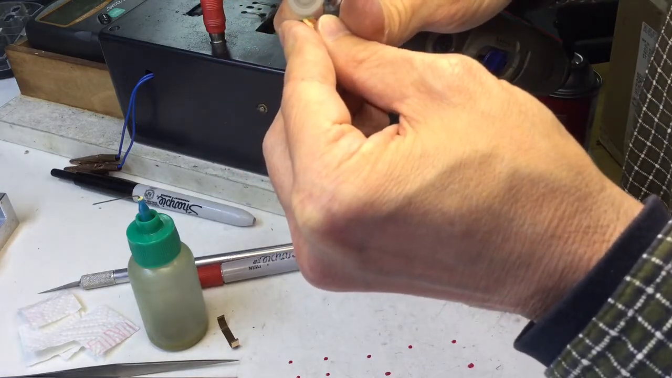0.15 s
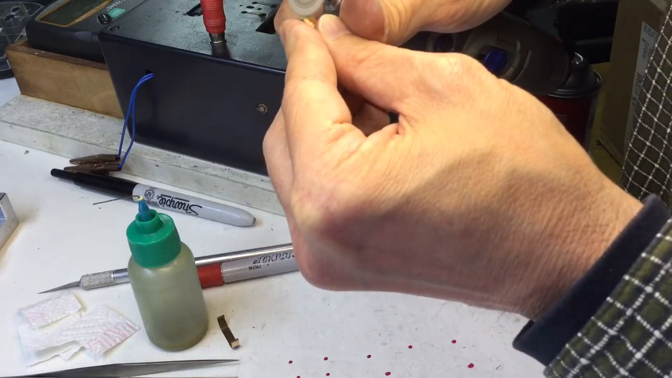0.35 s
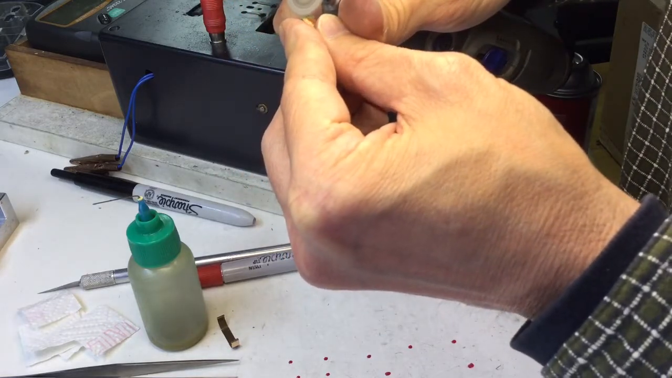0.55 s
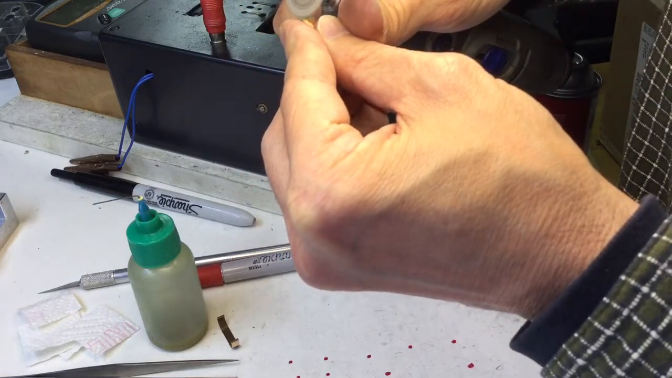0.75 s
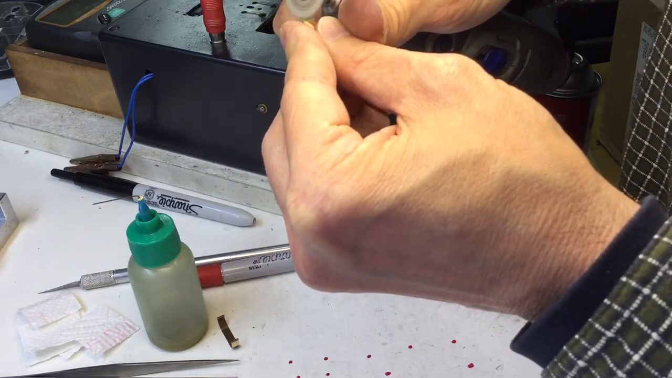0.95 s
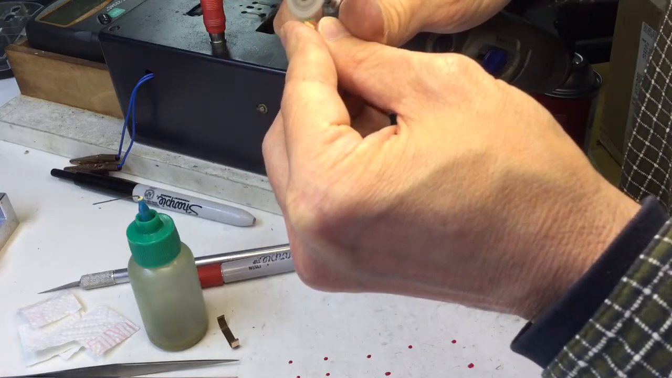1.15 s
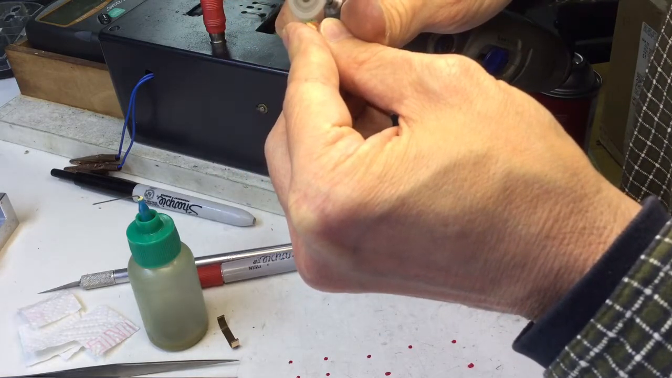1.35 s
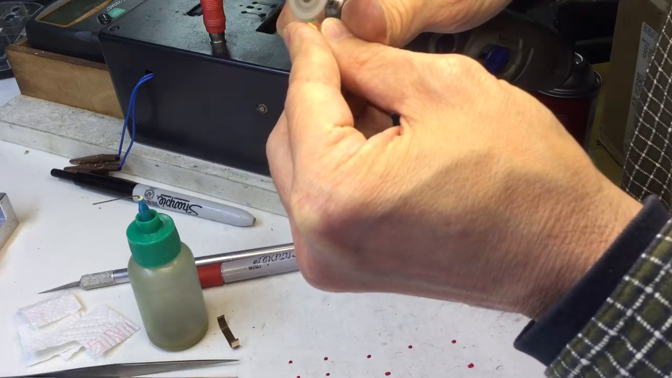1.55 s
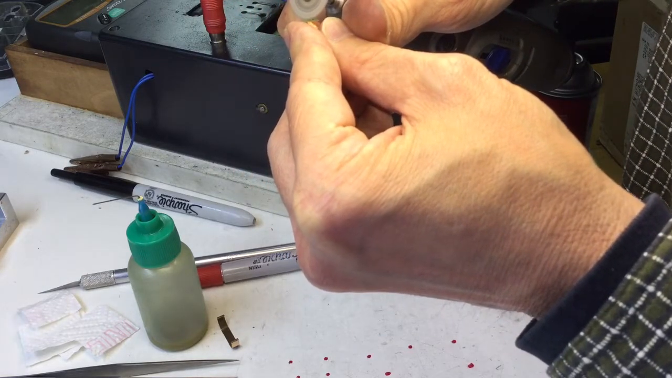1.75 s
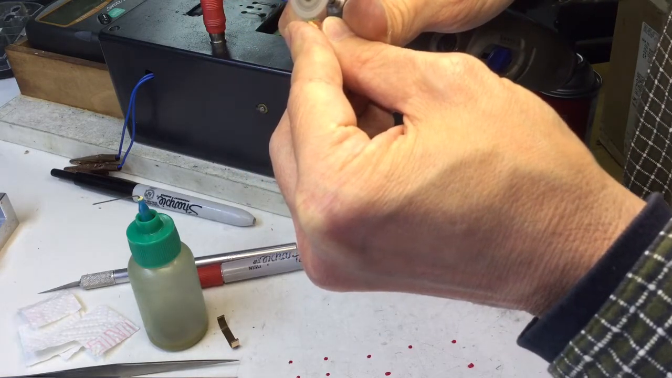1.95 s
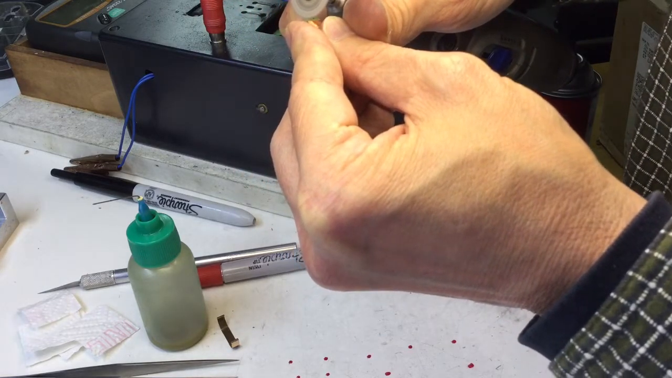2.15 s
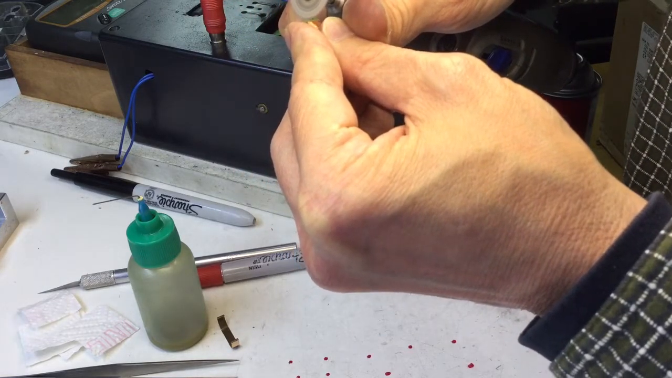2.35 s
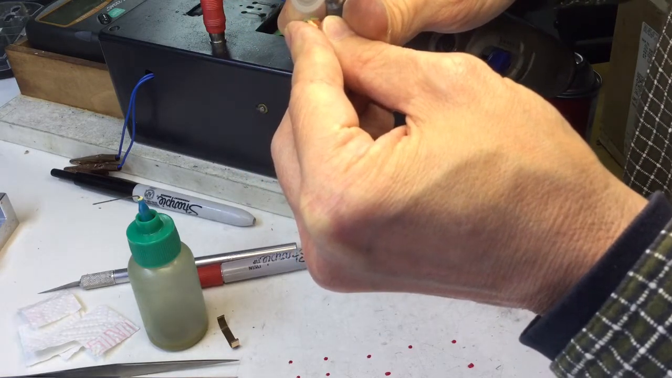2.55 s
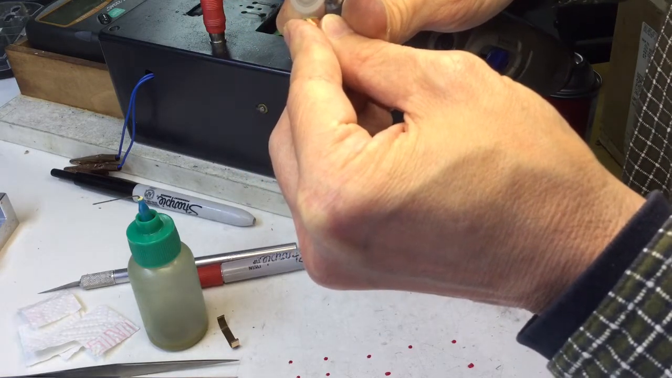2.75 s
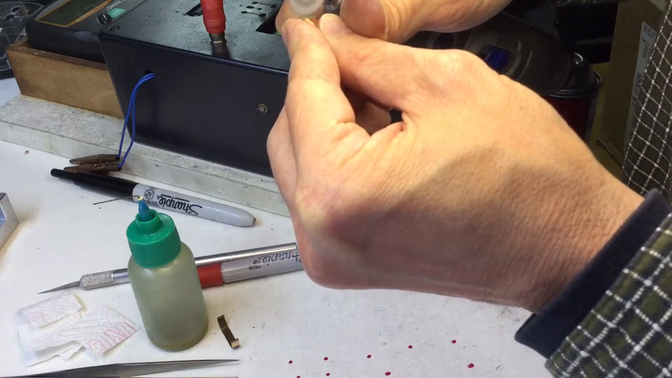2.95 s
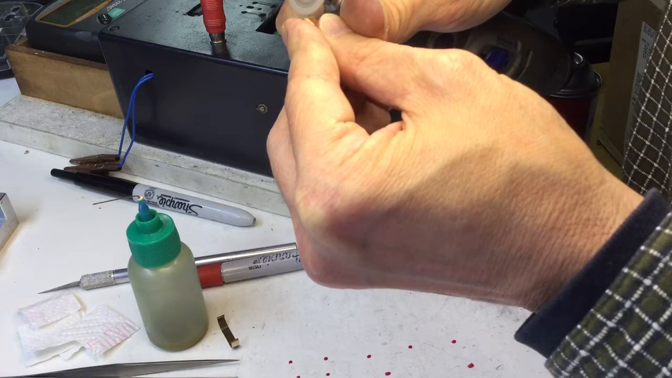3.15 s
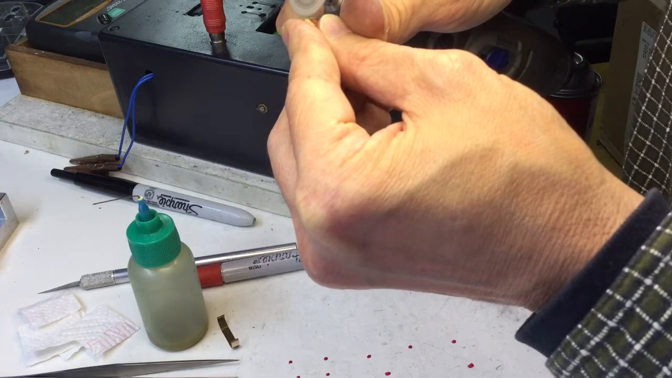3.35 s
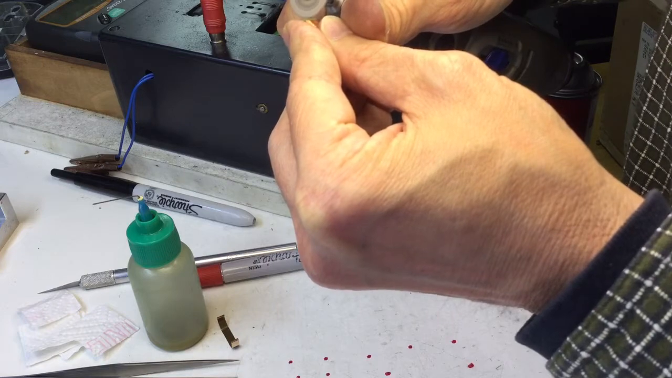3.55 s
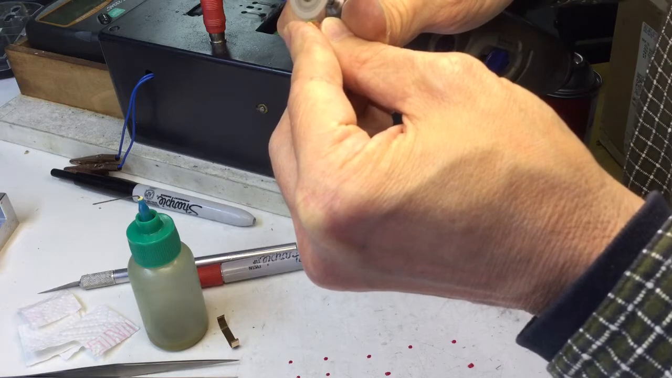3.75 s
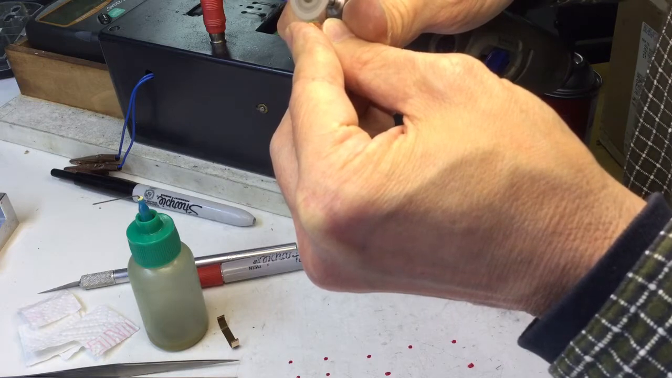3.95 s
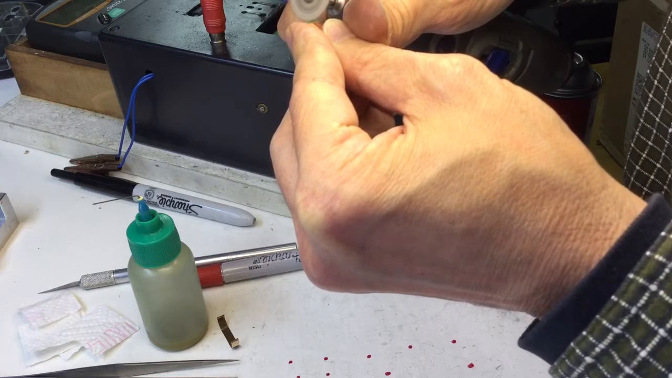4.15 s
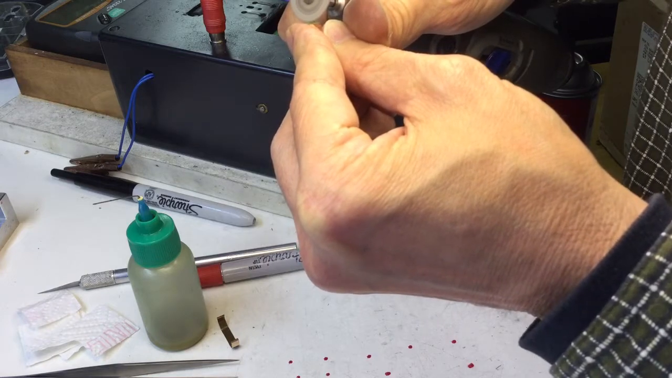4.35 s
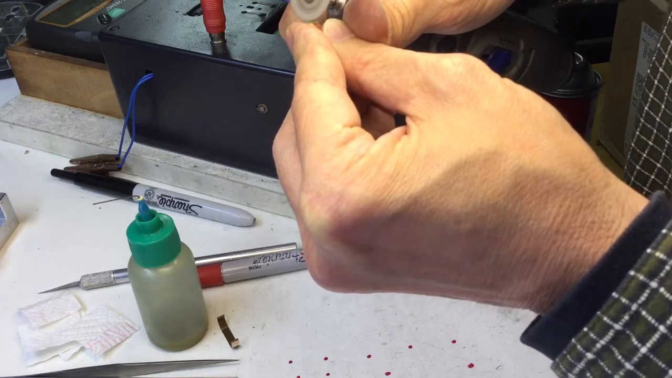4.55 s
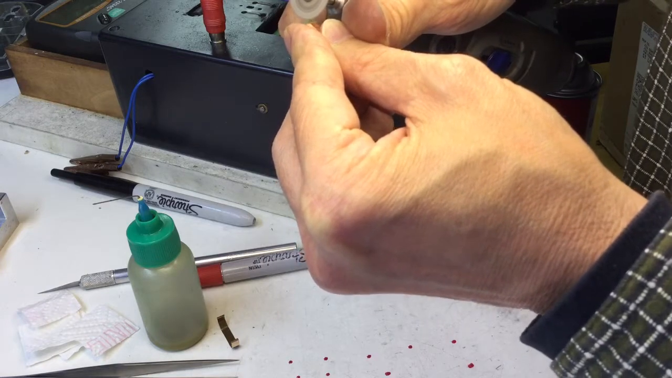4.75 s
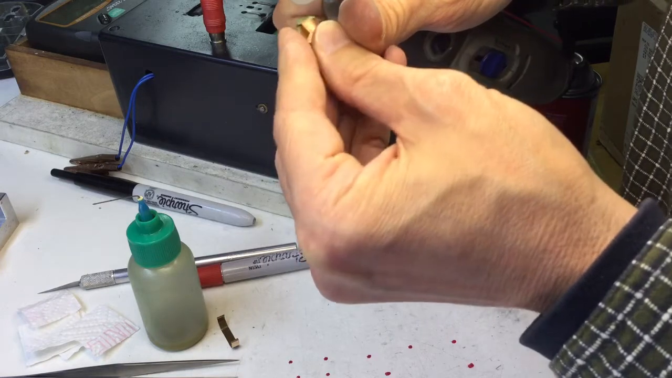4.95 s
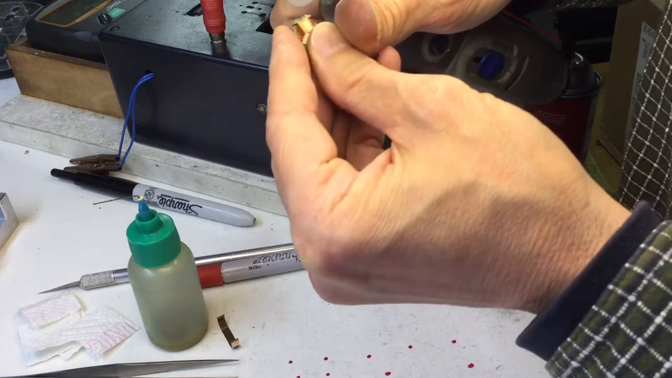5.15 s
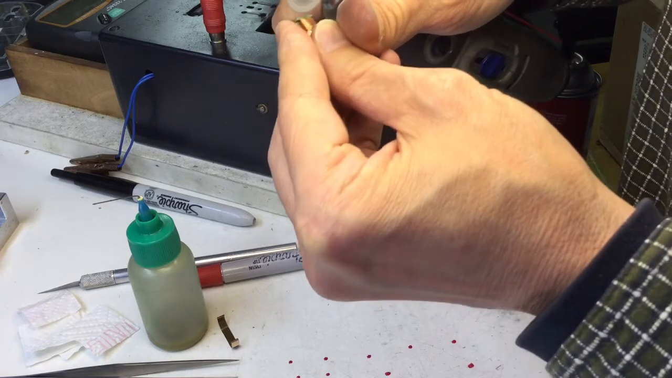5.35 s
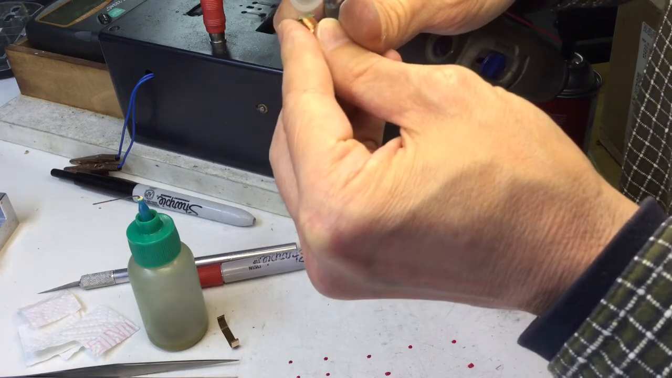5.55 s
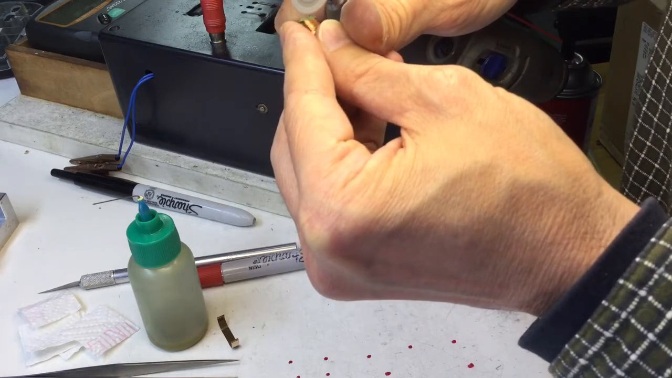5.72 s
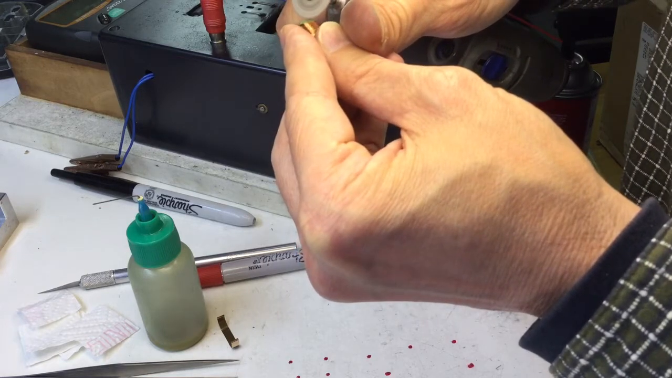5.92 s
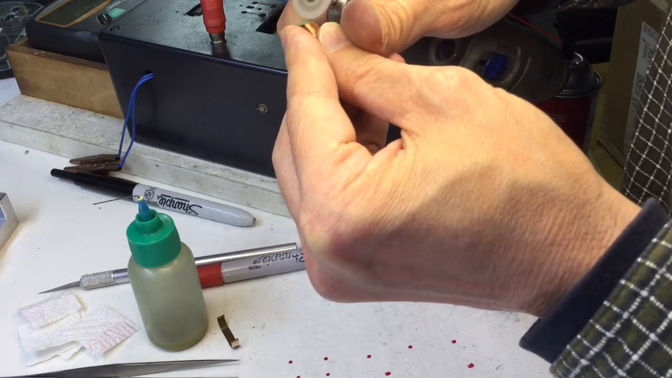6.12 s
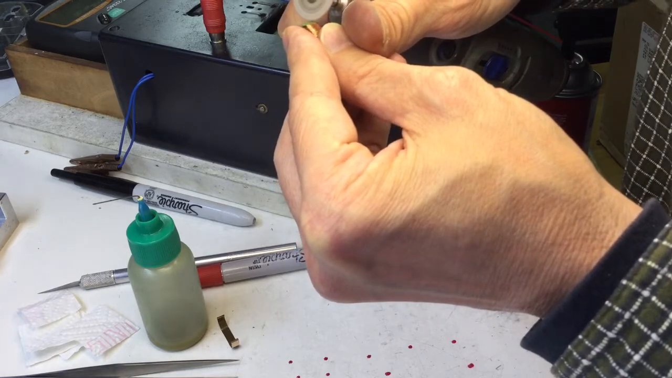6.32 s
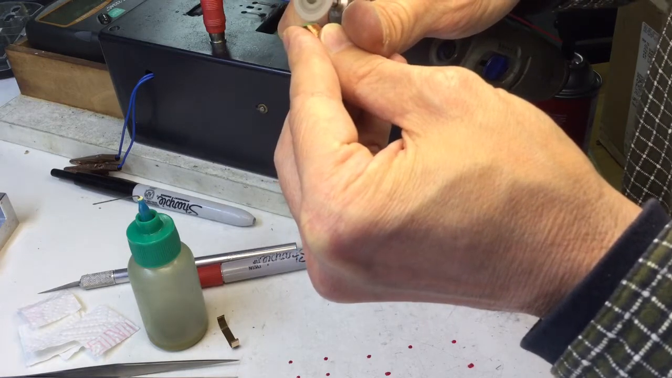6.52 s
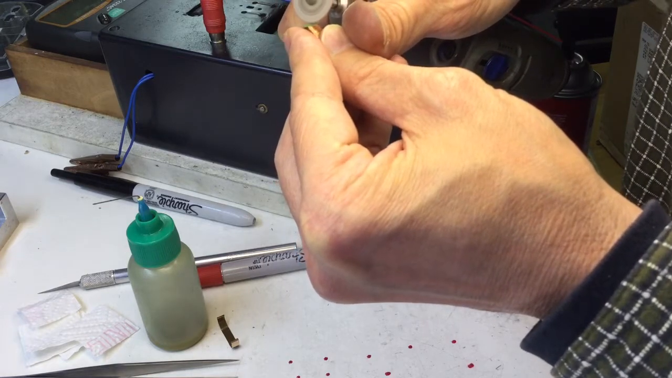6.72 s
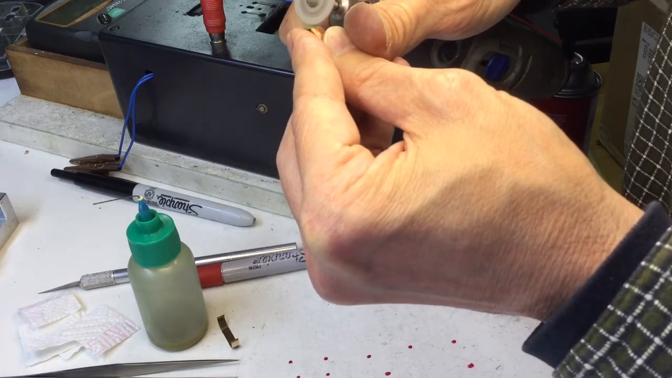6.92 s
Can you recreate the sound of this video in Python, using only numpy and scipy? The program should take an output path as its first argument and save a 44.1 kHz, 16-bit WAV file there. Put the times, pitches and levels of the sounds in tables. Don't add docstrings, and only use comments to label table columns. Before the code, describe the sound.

A small rotary tool grinds a hand-held metal part with a harsh, ringing buzz, its motor sagging under load and whining back up in the pauses.

```python
import sys
import numpy as np
from scipy import signal
from scipy.fft import rfft, irfft, next_fast_len
from scipy.io import wavfile
from scipy.ndimage import uniform_filter1d, map_coordinates

SR = 44100
rng = np.random.default_rng(int(sys.argv[2]) if len(sys.argv) > 2 else 0)


def boost_factor(decibels):
    exponent = np.asarray(decibels, float) / 20
    return 10 ** exponent


def log_audio(samples):
    frames = np.atleast_2d(samples).T
    limited = np.clip(frames, -1, 1)
    pcm = np.round(limited * 32767).astype(np.int16)
    wavfile.write(sys.argv[1], SR, pcm)


N = 312228
TIME = np.arange(N) / SR
FREE_SPEED = 163.5

# full contact t/s, closing time/s, leaving t/s, parting time/s
CONTACTS = [
    (-.1, .02, 2.46, .02),
    (2.995, .028, 4.803, 0.031),
    (5.448, 0.012, 5.558, 0.027),
    (5.864, .007, 7.3, .04),
]


def grinding(turns, speed):
    # t/s, pressure level/dB, pinch (0-1), contact arc/turns
    hand = [
        [(0, -20, 0.23, 0.31), (.3, -20, 0.15, 0.33), (.8, -20.5, 0.4, 0.34), (1.1, -21, .05, 0.32),
         (1.3, -23.5, .7, 0.35), (1.55, -22.5, 0.83, 0.3), (2.2, -21, 0.6, 0.23), (2.41, -20, 0.67, 0.24),
         (2.46, -26.5, 0.3, 0.32)],
        [(3.02, -27, 0.1, 0.33), (3.07, -24, 0, 0.16), (3.25, -24.5, 0.33, 0.3), (3.4, -22.5, 0.31, .36),
         (3.75, -22, 0.38, 0.34), (4.05, -22.5, .1, 0.41), (4.4, -21.5, .5, 0.35), (4.47, -21, 0.64, 0.25),
         (4.8, -21, 0.66, 0.29)],
        [(5.448, -25.5, 0.1, .26), (5.544, -26, 0.1, .26)],
        [(5.866, -24.5, 0, .27), (5.93, -24, 0.14, 0.18), (6.18, -22, 0.1, 0.3), (6.26, -22.5, 1, 0.33),
         (6.4, -23, 0.4, 0.42), (6.5, -23, 0.04, 0.53), (6.64, -21.5, 0.5, 0.44), (6.82, -23, 0.34, 0.53),
         (7.08, -20.5, 0.3, 0.45)],
    ]
    # f/Hz, width/Hz, level/dB
    low_modes = [(2040, 55, -13.5), (2434, 92, -9), (3414, 192, -1)]
    loose_modes = [(3806, 29, -3.5), (4388, 176, 6.5), (4517, 137, 7), (5484, 430, -12.5)]
    pinched_modes = [(3847, 25, -12), (4552, 176, 3.5), (4626, 296, 1), (5075, 265, -8.5)]
    rasp_modes = [(7250, 150, -2), (7660, 420, -6.5), (8580, 560, 1), (9290, 330, -9), (9030, 550, -16),
                  (10170, 200, -7.5)]
    sizzle_modes = [(10350, 510, 7), (11130, 770, 5.5), (11430, 460, 5), (12600, 970, -1), (13230, 4300, 9),
                    (14100, 500, -1), (14900, 550, 5)]
    # f/Hz, width/Hz, level/dB
    grip_modes = [(280, 48, -9.5), (577, 65, -3), (796, 147, -5), (1193, 360, -1), (1550, 276, 2.5),
                  (2350, 1500, -4)]
    # t/s, level/dB, time back to
    # normal/s
    edge_catches = [(.04, 3.5, 0.58), (.35, 2.5, 0.087), (1.11, 3, .2), (1.31, 6, 0.075), (1.44, 6, 0.059),
                    (1.55, 3, .3), (3.05, 3, 0.078), (3.458, 2.5, 0.041), (3.724, -1.5, 0.34),
                    (4.078, -5, 0.14), (5.448, 2.5, 0.08), (6.13, 3, 0.11), (6.634, 1.5, .18),
                    (7, 2, 0.079)]
    # t/s, level/dB, sinking time/s
    jolts = [
        (.05, 6, .5),
        (.6, 6, 0.33),
        (1.55, 6, 0.34),
        (3.02, -15, 0.17),
        (4.55, 5, 0.06),
        (4.62, -7, 0.084),
        (4.7, 6, 0.062),
        (5.47, 5, 0.1),
    ]
    # from t/s, to t/s, level/dB
    tips = [
        (1.327, 2.293, 6.5),
        (3.144, 3.237, 6.5),
        (3.326, 3.656, 3),
        (4.077, 4.78, 2.5),
        (5.5, 5.557, 3.5),
        (5.892, 5.915, 0.5),
        (6.24, 6.884, 4),
    ]
    # t/s, level/dB, sinking time/s
    grit_changes = [
        (.4, 5, .12),
        (1.3, -4, .08),
        (1.4, 4, .15),
        (3.07, 3, .1),
        (4.31, 6.5, 0.088),
        (5.88, 3, 0.055),
        (5.96, -3, 0.087),
    ]
    # t/s, level/dB, return time/s
    skids = [
        (1.07, -1, 0.054),
        (1.25, -3, .05),
        (3.0, -1, .06),
        (5.945, -4.5, 0.091),
        (6.17, -2, .05),
    ]

    press_db, pinch, arc = curves(np.vstack(hand))
    pinch = np.clip(pinch, 0, 1)
    arc = np.clip(arc, .15, .5)
    near = closing()
    touching = (near > 0) * boost_factor(37 * (near - 1) + press_db + surges(skids))
    sag = FREE_SPEED - speed

    landing = surges([(start, 1, 0.36) for start, *_ in CONTACTS[1:]])
    tipped_db = 0
    for start, end, db in tips:
        inside = np.minimum(TIME - start, end - TIME)
        tipped_db = tipped_db + db * np.clip(1 + inside / .05, 0, 1)

    arc_short = np.minimum(arc - 0.38, 0)
    low_db = -7.5 + 54 * arc_short + 6 * landing
    rasp_db = -6 + tipped_db + 1 * pinch
    sizzle_db = -2.5 + 7.2 * arc_short + landing + surges(grit_changes)
    sizzle_db -= 0.85 * TIME
    shake_db = -45.5 + 22.5 + 0.086 * sag + surges(jolts)

    strength = boost_factor((2.5 - 5.5 * arc) * rng.standard_normal(1200)[turns.astype(int)])

    push = strength * contact(turns, 1.2 * arc, lag=.04, slack_db=-16)
    push = push * grit(turns, memory=8, fresh=.14, size=128)
    loose = np.sqrt(1 - pinch) * rung(push, loose_modes)
    pinched = np.sqrt(pinch) * rung(push, pinched_modes)
    ring = steady(loose + pinched)
    low = steady(rung(push, low_modes))

    scrape = strength * contact(turns, .9 * arc, lag=0, slack_db=-20)
    scrape = scrape * grit(turns, memory=14, fresh=.25, size=224)
    rasp = rung(scrape, rasp_modes, sign=1)
    rasp = steady(rung(rasp, [(8460, 5300, 0)]))

    fine = strength * contact(turns, 1.2 * arc, lag=0, slack_db=-11)
    fine = fine * grit(turns, memory=5, fresh=.35, size=256)
    sizzle = rung(fine, sizzle_modes, sign=1)

    shake = contact(turns, arc, lag=0, slack_db=-7) * grit(turns, memory=22.0, fresh=0.044, size=64)
    grip = rung(shake, grip_modes)

    part = boost_factor(surges(edge_catches)) * ring + boost_factor(low_db) * low
    part = part + boost_factor(rasp_db) * rasp + boost_factor(sizzle_db) * sizzle
    return touching * (part + boost_factor(shake_db) * grip)


def grit(turns, memory, fresh, size):
    keep = np.exp(-1 / max(memory, .3))
    face = signal.lfilter([1], [1, -keep], rng.standard_normal((1200, size)), axis=0)
    worn = unit(map_coordinates(face.ravel(), [(turns + 60) * size]))
    fresh = np.clip(fresh, 0, 1)
    return np.sqrt(1 - fresh) * worn + np.sqrt(fresh) * rng.standard_normal(N)


def contact(turns, arc, lag, slack_db):
    angle = (turns - lag) % 1
    bite = np.clip(angle / 0.011, 0, 1) / (1 + (angle / arc) ** 6)
    return bite + boost_factor(slack_db)


def closing():
    near = 0
    for start, rise, end, fall in CONTACTS:
        ramp = np.minimum(1 + (TIME - start) / rise, 1 + (end - TIME) / fall)
        near = near + np.clip(ramp, 0, 1)
    return near


def steady(x):
    return x / np.sqrt(np.abs(uniform_filter1d(x ** 2, size=1300)) + 0.057)


def chatter():
    # t/s, peak level/dB
    bites = [
        (4.3104, -12),
        (4.319, -8),
        (5.9449, -8),
        (6.0017, -4.5),
        (6.0606, -2),
        (6.0922, -3.5),
        (6.124, -14),
        (6.144, -4),
    ]
    blows = np.zeros(N)
    burst = np.hanning(90) * np.sin(2 * np.pi * 4380 * np.arange(90) / SR)
    for s, db in bites:
        blows[round(s * SR):][:90] += boost_factor(db - 4.5) * burst
    return 1.75 * filtered(blows, lambda f: resonance(f, 4380, 300))


def shaft_speed():
    # t/s, shaft speed/(turns/s)
    loads = [
        [(0, 164), (.37, 144.5), (.62, 136), (.85, 132.6), (1.33, 147.5), (1.48, 144.5), (1.7, 126.3),
         (2.17, 124.6), (2.4, 131.5)],
        [(3.04, 162.7), (3.21, 156.5), (3.47, 142.9), (3.73, 135.4), (4.02, 133.3), (4.37, 141.2),
         (4.56, 127.8), (4.67, 131.8), (4.785, 128.7)],
        [(5.44, 162.3), (5.56, 155.9)],
        [(5.9, 162.3), (5.98, 159.6), (6.35, 143), (6.43, 142.4), (6.58, 137.4), (6.94, 135.5), (7.02, 131.8),
         (7.08, 132.3)],
    ]
    speed = curves(np.vstack(loads))[0]
    for before, after in zip(loads, loads[1:]):
        release, slow = before[-1]
        gap = (TIME > release) & (TIME < after[0][0])
        lost = (FREE_SPEED - slow) * np.exp(-np.abs(TIME - release) / .172)
        speed = np.where(gap, FREE_SPEED - lost, speed)
    return uniform_filter1d(speed, size=2600, mode="nearest")


def motor(turns, speed):
    # shaft speed/(turns/s), rattle level/dB, third partial level/dB
    cage_levels = [(124, -54, -65), (132, -48.5, -77), (139.8, -53, -74), (147.6, -44.5, -47.5),
                   (167, -41, -45.5)]
    # f/Hz, half width/Hz, level/dB
    ninth_modes = [(1150.6, 50, -46.5), (1238, 23, -46), (1311, 52, -43.5)]
    sixth_modes = [(769, 43, -47.5), (960, 90, -59)]
    lower_modes = [(393, 36, 1), (490, 45, 4), (626, 39, 5), (775, 66, 2.5)]
    # multiple of shaft speed, level/dB
    free_orders = [(7, -58), (8, -56.5), (10, -59.5), (11, -73), (12, -74), (13, -58), (16, -57), (17, -77),
                   (18, -69), (19, -70)]
    # carrier f/Hz, offset/shaft orders, level/dB
    sidebands = [(7994, 0, -55), (7994, -3, -67), (7994, 3, -68), (7994, 9, -75), (7994, 12, -70),
                 (15988, -3, -56), (15988, -6, -76)]
    # f/Hz, level/dB
    mains = [(118.4, -65), (177.6, -79), (356, -61.5)]

    def tone(cycles, db):
        return np.sqrt(2) * boost_factor(db) * np.sin(2 * np.pi * (cycles + rng.random()))

    calm = np.clip((1.6 - TIME) / 0.27, 0, 1)
    at, *levels = np.transpose(cage_levels)
    rattle_db, third_db = (np.interp(speed, at, db) - 34 * calm for db in levels)
    cage = 2.208 * turns
    out = tone(cage, rattle_db + 0.76 * wobble(25))
    out += tone(3 * cage, third_db + 0.9 * wobble(25))
    out += tone(2 * cage, third_db - 20) + tone(5 * cage, third_db - 11.0)

    out += tone(9 * turns, met(9 * speed, ninth_modes) + 1.3 * wobble(21) + 3.0 * wobble(2.93))
    out += tone(6 * turns, met(6 * speed, sixth_modes) + 1.6 * wobble(20))
    second_db = -69.5 + 9.5 * calm + 0.35 * (FREE_SPEED - speed)
    out += tone(2 * turns, second_db + 0.75 * wobble(20.6))
    lower_db = -64.5 + 5.5 * closing()
    for k, db in [(3, -2.0), (4, -1.5), (5, 0.2)]:
        out += tone(k * turns, lower_db + db + met(k * speed, lower_modes) + 2.8 * wobble(5))

    out += tone(15 * turns, -49 + .5 * (speed - 161) + 1.1 * wobble(9))
    fast_db = 0.24 * (speed - 161) - 8 * calm
    for k, db in free_orders:
        out += tone(k * turns + 0.012 * wobble(30), db + fast_db + 0.84 * wobble(13))
    for hz, k, db in sidebands:
        out += tone(hz * TIME + k * turns, db + 1.7 * wobble(6.3))
    for hz, db in mains:
        out += tone(hz * TIME, db + 2.5 * wobble(12))
    return out


def met(hz, modes):
    power = sum(boost_factor(2 * db) / (1 + ((hz - c) / w) ** 2) ** 2 for c, w, db in modes)
    return 10 * np.log10(power)


def hiss(turns, speed):
    # f/Hz, level/dB
    brush_spectrum = [(150, -12), (300, -9.5), (1000, 0.5), (1900, -1), (2400, 3.5), (3300, -5.5),
                      (4350, -2.5), (5800, -9.5), (7100, -3), (8100, 2), (8900, -5.5), (11800, -11),
                      (13200, -8), (15800, -7.5)]
    # f/Hz, width/Hz, level/dB
    housing_modes = [(2380, 36, -8.5), (4380, 67, -3), (7150, 72, -0.5), (7800, 120, -7), (10040, 44, -4),
                     (11800, 170, -8.5)]
    # f/Hz, level/dB per Hz
    room_spectrum = [(20, -45), (80, -39), (105, -48), (119, -1.5), (135, -22), (200, -8.5), (400, -13),
                     (1000, -59)]
    chop = 1 + 0.093 * np.sin(2 * np.pi * 3 * turns)
    housing = boost_factor(-5.5) * rung(chop * rng.standard_normal(N), housing_modes)
    level_db = -46 + closing() * (3 + 0.082 * (FREE_SPEED - speed))
    return boost_factor(level_db) * (chop * shaped(brush_spectrum) + housing) + boost_factor(-60) * shaped(room_spectrum)


def bench(x, t60):
    t = np.arange(SR // 4) / SR
    tail = rng.standard_normal(len(t)) * boost_factor(-60 * t / t60) * (t > .003)
    return signal.fftconvolve(x, tail / np.linalg.norm(tail))[:N]


def resonance(f, centre, width):
    return 1j * f * width / (centre * centre - f * f + 1j * f * width)


def rung(x, modes, sign=-1):
    def response(f):
        return sum(sign ** k * boost_factor(db) * resonance(f, c, w) for k, (c, w, db) in enumerate(modes))

    return unit(filtered(x, response))


def filtered(x, response):
    m = next_fast_len(N + 8192)
    return irfft(rfft(x, m) * response(np.fft.rfftfreq(m, 1 / SR)), m)[:N]


def shaped(points):
    f, db = np.transpose(points)
    return unit(filtered(rng.standard_normal(N), lambda hz: boost_factor(np.interp(np.log(hz + 1), np.log(f), db))))


def surges(rows):
    total = 0
    for s, db, sink in rows:
        shape = np.minimum(1 + (TIME - s) / 0.025, 1 - (TIME - s) / sink)
        total = total + db * np.clip(shape, 0, 1)
    return total


def wobble(rate):
    coarse = TIME[::100]
    knots = rng.standard_normal(int(N * 40 / SR) + 4)
    return np.interp(TIME, coarse, map_coordinates(knots, [coarse * min(rate, 39)]))


def curves(rows):
    s, *cols = np.transpose(rows)
    return [np.interp(TIME, s, c) for c in cols]


def unit(x):
    return x / np.sqrt(np.mean(x ** 2) + 1e-20)


def scene():
    speed = shaft_speed()
    turns = np.cumsum(speed) / SR
    cut = grinding(turns, speed) + chatter()
    reflected = boost_factor(-11.0) * bench(cut, t60=0.067)
    return (cut + reflected + motor(turns, speed) + hiss(turns, speed))[None]


def top_cut(x):
    return signal.sosfilt(signal.butter(12, 17020, fs=SR, output="sos"), x)


def record(dry):
    def microphone(hz):
        return (hz < 15840) / (1 + (90 / (hz + 1)) ** 3)

    level_db = 10 * np.log10(np.abs(uniform_filter1d(dry[0] ** 2, size=1500)) + 1e-9)
    quiet_db, loud_db, duck_s = -39, -28, 0.29
    loud = np.clip((level_db - quiet_db) / (loud_db - quiet_db), 0, 1)
    keep = np.exp(-1 / (duck_s * SR))
    duck = signal.lfilter([1 - keep], [1, -keep], loud, zi=[keep])[0]
    return top_cut(filtered(boost_factor(-5 * duck) * dry[0], microphone)[None])


dry = scene()
out = record(dry)
log_audio(out)
```